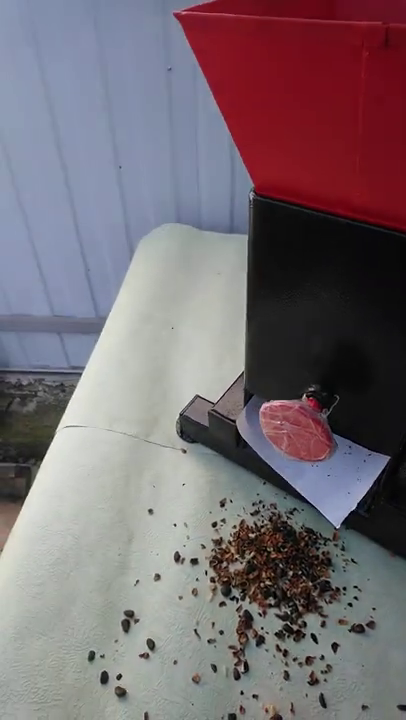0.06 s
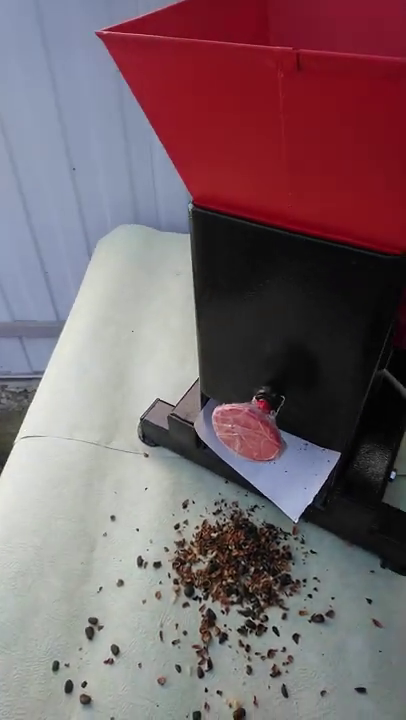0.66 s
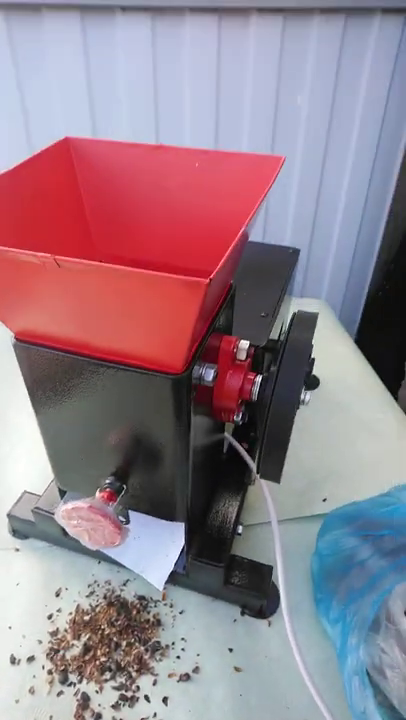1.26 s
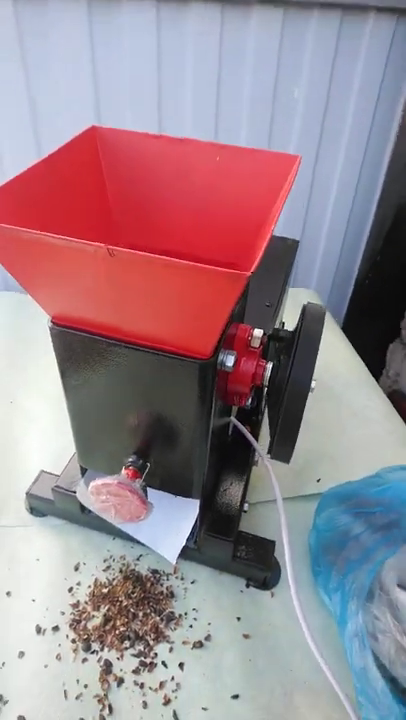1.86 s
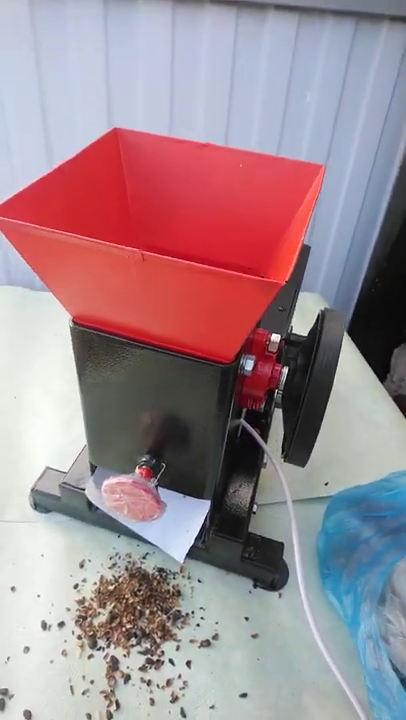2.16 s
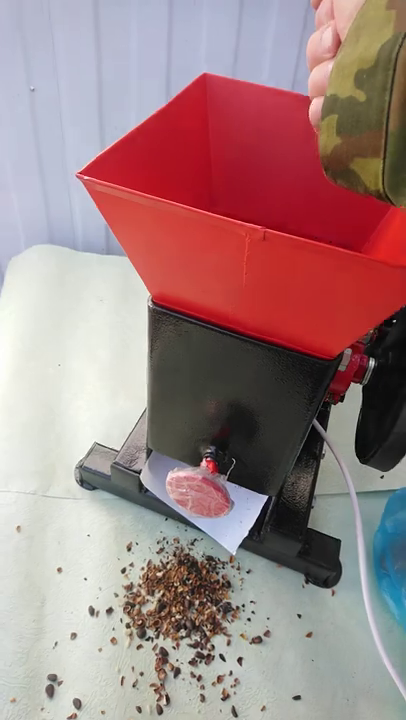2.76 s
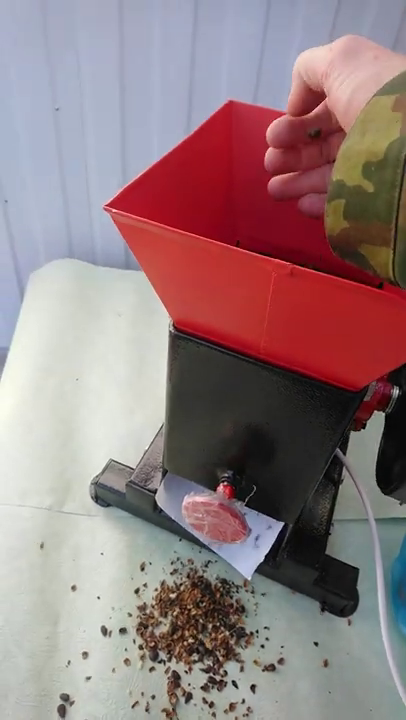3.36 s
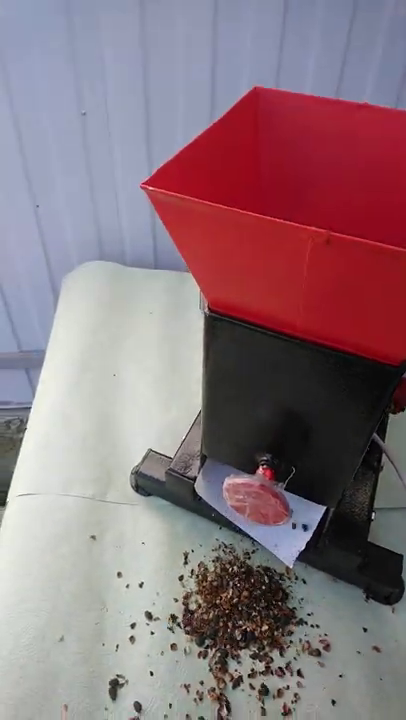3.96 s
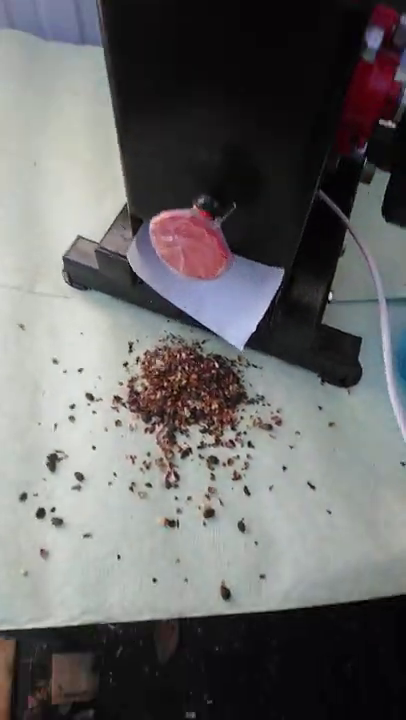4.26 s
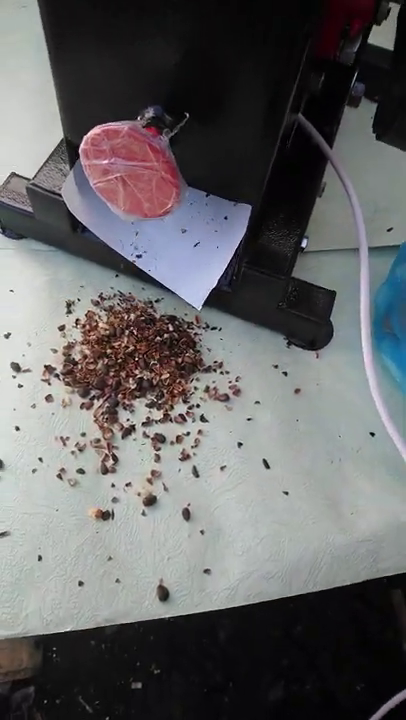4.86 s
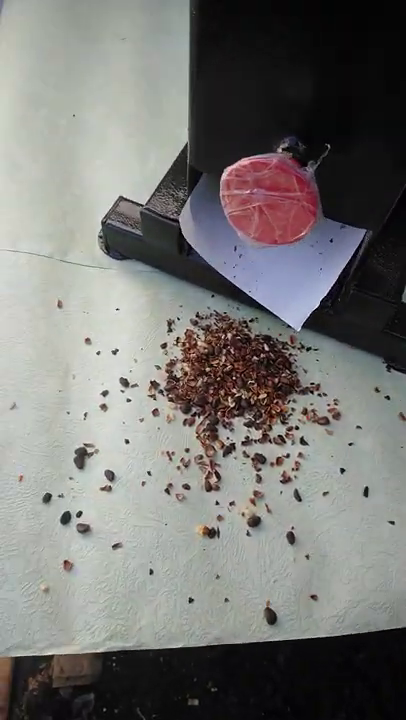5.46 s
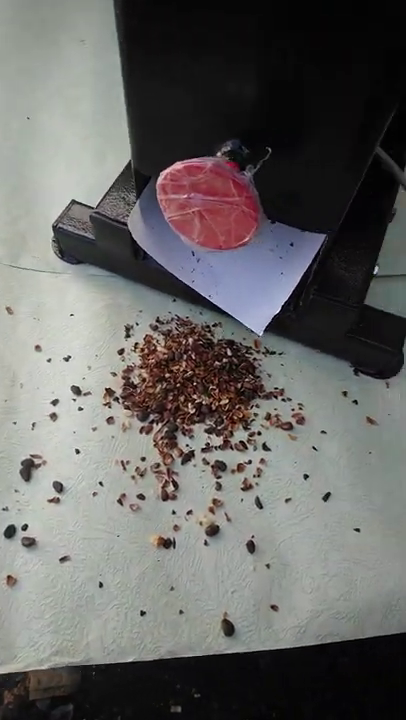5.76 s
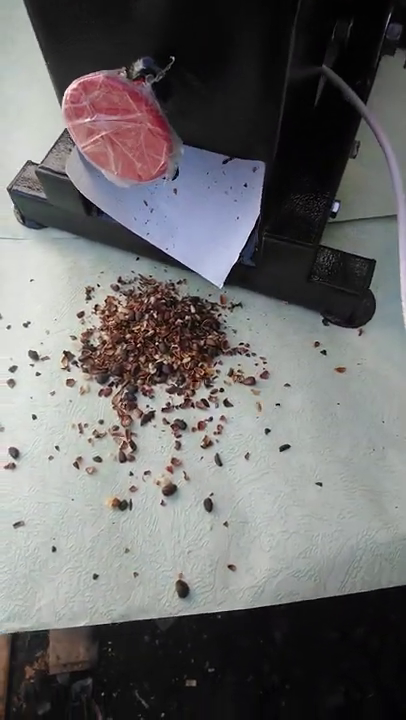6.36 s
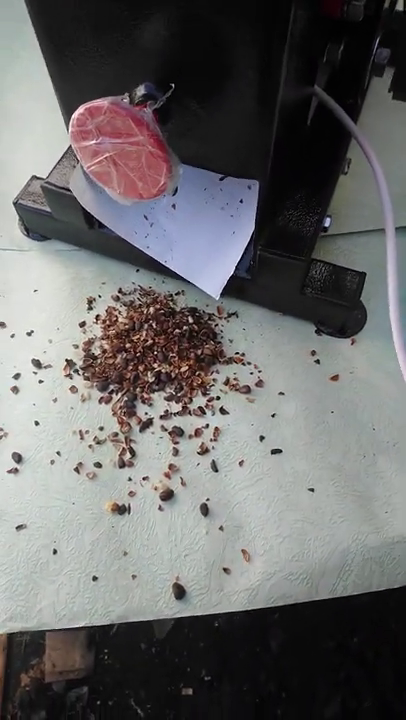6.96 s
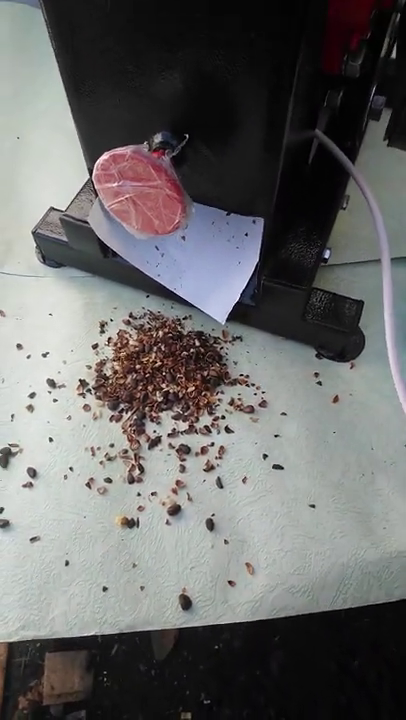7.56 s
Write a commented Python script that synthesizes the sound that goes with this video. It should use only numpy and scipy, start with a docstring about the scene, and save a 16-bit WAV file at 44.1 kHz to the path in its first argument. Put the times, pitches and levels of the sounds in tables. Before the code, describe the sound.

A belt-driven nut splitter hums and hisses outdoors near a hand-held microphone, with light taps of shell and intermittent high whistles. Midway, nuts crunch in a quick, loud cluster of cracks that rings the metal hopper and slows the rotor a little. A few separate cracks follow. The drone dips under the cracks, swells back and continues with its thin squealing.

```python
"""A steady drone with a hiss and thin squeals: a belt-driven electric nut splitter runs outdoors, close to
a hand-held camera. Its unbalanced rotor hums and rubs once a turn; bits of shell tick in the housing.
A handful of nuts rattles through the sheet-metal hopper as the rotor slows; three last shells crack.
Each fracture is a burst of noise that rings the shell and the hopper. The camera's gain control ducks
under the cracks and creeps back while the camera moves down to the spout."""
import sys
import numpy as np
from scipy import signal
from scipy.fft import rfft, irfft, next_fast_len
from scipy.io import wavfile
from scipy.ndimage import uniform_filter1d, minimum_filter1d, map_coordinates

SR = 44100
rng = np.random.default_rng(int(sys.argv[2]) if len(sys.argv) > 2 else 0)


def file_out(sig):
    """Save sig as 16-bit WAV at sys.argv[1]."""
    # one column per channel
    cols = np.atleast_2d(sig).T
    # limit, then scale
    lim = np.clip(cols, -1, 1)
    pcm = np.round(lim * 32767).astype(np.int16)
    wavfile.write(sys.argv[1], SR, pcm)


N = 339570
TIME = np.arange(N) / SR


def amp(db):
    """Decibels as an amplitude ratio."""
    return 10 ** (np.asarray(db) / 20)


def unit(x):
    """Normalisation to rms 1."""
    return x / np.sqrt(np.mean(x ** 2) + 1e-20)


def along(points, hz):
    """Interpolation of (Hz, value) points on a logarithmic frequency axis."""
    knots_hz, values = np.transpose(points)
    return np.interp(np.log(hz + 1), np.log(knots_hz + 1), values)


def curves(rows):
    """Linear interpolation: one value per sample for each column after the time."""
    times, *columns = np.transpose(rows)
    return [np.interp(TIME, times, column) for column in columns]


def wobble(rate):
    """Random modulation: a smooth curve through rate knots a second."""
    return map_coordinates(rng.standard_normal(int(N * rate / SR) + 4), [TIME * rate])


def spell(start, end, fade):
    """A trapezoidal envelope: rises at start, holds at 1 and falls at end."""
    return np.clip(np.minimum(TIME - start, end - TIME) / fade + .5, 0, 1)


def filtered(x, response):
    """Linear filtering: the spectrum of x times a complex response of frequency."""
    n = x.shape[-1]
    padded = next_fast_len(n + n // 10, True)
    return irfft(rfft(x, padded) * response(np.fft.rfftfreq(padded, 1 / SR)), padded)[..., :n]


def coloured(x, spectrum):
    """Spectral shaping of x by (Hz, dB) points, at rms 1."""
    return unit(filtered(x, lambda hz: amp(along(spectrum, hz))))


def ringing(x, modes):
    """Modal superposition: x drives (Hz, bandwidth, dB) resonators of alternating sign, at rms 1."""
    def response(hz):
        return sum((-1) ** k * amp(db) * 1j * hz * width / (centre ** 2 - hz ** 2 + 1j * hz * width)
                   for k, (centre, width, db) in enumerate(modes))
    return unit(filtered(x, response))


def running_rms(x, seconds):
    """The root of the power averaged over both channels and a sliding window."""
    power = uniform_filter1d(np.mean(x ** 2, axis=0), max(2, int(seconds * SR)))
    return np.sqrt(np.abs(power) + 1e-12)


def add(track, start, sound):
    """Superposition of a sound on the track, from start in seconds."""
    part = track[:, round(start * SR):][:, :sound.shape[1]]
    part += sound[:, :part.shape[1]]


def standing_waves(x, depth_db, spacing_hz, change_rate):
    """Interference: wall and panel echoes lift and sink narrow bands, which shift as the camera sways."""
    hz, t, spectra = signal.stft(x, SR, nperseg=1024)
    grid = np.meshgrid(hz / spacing_hz, t * change_rate, indexing="ij")
    knots = rng.standard_normal((2, 400, 32))
    field = np.array([map_coordinates(channel, grid, mode="grid-wrap") for channel in knots])
    depth = depth_db * hz / (hz + 1200)  # short waves interfere most
    _, rippled = signal.istft(spectra * amp(depth[:, None] * field), SR, nperseg=1024)
    return unit(rippled[:, :N])


# The casing's noise at the hopper and at the spout. Each row: frequency in Hz, relative density in dB.
CASING_AT_HOPPER = [(25, -25), (55, -5), (110, 10.5), (140, -2), (230, -6), (360, 4), (500, -6.5), (600, 5),
                    (830, -1.5), (1100, 2.5), (1500, -7.5), (2100, -5.5), (2900, -15), (5000, -29)]
CASING_AT_SPOUT = [(25, -30), (55, -2), (110, 3.5), (230, -2), (350, 9), (510, -1), (600, 2), (750, 1.5),
                   (1000, 3.5), (1170, -8.5), (1400, -3.5), (1850, -6), (2900, -10.5), (5000, -23)]
# The casing panels' modes. Each row: frequency in Hz, bandwidth in Hz, relative gain in dB.
PANEL_MODES = [(583, 47, -1), (794, 24, -5), (1000, 46, -3.5), (1124, 66, -2), (1367, 63, -2),
               (1813, 76, -7)]

def casing_rumble(turns, near, rattle_db=1.5, throb_db=0.2, panel_db=-7, knock_db=4):
    """Forced vibration: the casing rattles unevenly, throbs once a turn and knocks its hollow panels."""
    shake = rng.standard_normal((2, N))
    shake *= amp(rattle_db * wobble(220) + throb_db * np.cos(2 * np.pi * turns))
    body = (1 - near) * coloured(shake, CASING_AT_HOPPER) + near * coloured(shake, CASING_AT_SPOUT)
    knocks = rng.standard_normal((2, N)) * amp(knock_db * wobble(150))
    casing = body + amp(panel_db) * ringing(knocks, PANEL_MODES)
    return standing_waves(casing, depth_db=5.5, spacing_hz=79.14, change_rate=1.142)


# The hum's tones. Each entry: a multiple of the rotor speed; pulley and belt give the fractional ones.
HUM_ORDERS = [.837, 1, 1.05, 1.163, 1.28, 1.35, 1.84, 1.93, 2, 2.05, 2.163, 4, 7, 8, 11]
# The hum at the hopper and at the spout. Each entry: relative level of the matching tone in dB.
HUM_AT_HOPPER = [-73, -24, -47, -34, -45, -42.5, -41.5, -39.5, -23.5, -34.5, -40.5, -28.5, -34.5, -41.5,
                 -38]
HUM_AT_SPOUT = [-59, -26, -53.5, -35.5, -39, -36.5, -44, -43, -19.5, -35.5, -29.5, -30, -37.5, -44, -42]

def rotor_hum(turns, near, waver_db=0.7, drift_rad=0.12, rough_db=0.42):
    """Rotating unbalance: rotor, pulley and belt shake the frame; higher orders rattle more."""
    out = np.zeros(N)
    for order, hopper_db, spout_db in zip(HUM_ORDERS, HUM_AT_HOPPER, HUM_AT_SPOUT):
        level_db = hopper_db + near ** 2 * (spout_db - hopper_db) + waver_db * wobble(6.9)
        rattle = unit(amp(rough_db * order * wobble(60)))
        phase = 2 * np.pi * order * turns + drift_rad * wobble(11)
        out -= np.sqrt(2) * amp(level_db) * rattle * np.cos(phase)
    return out


# Friction noise at the hopper and at the spout. Each row: frequency in Hz, relative density in dB.
RUB_AT_HOPPER = [(1500, -17.5), (3000, -5), (4000, -1.5), (5200, -0.5), (6000, -4.5), (6900, -7.5),
                 (7900, -21.5), (8800, -13.5), (10500, -17), (12500, -20.5), (15500, -17)]
RUB_AT_SPOUT = [(1500, -31), (3000, -5), (4000, -3.5), (5000, 0), (6000, -3.5), (6800, -7), (7900, -29.5),
                (8800, -14), (10500, -16.5), (12500, -24.5), (15500, -17.5)]

def rotor_rub(turns, near, change_rate=1.106, bumps_db=1.0, hiss_db=-2.5, grains=512, spots=16):
    """Periodic friction: the same rough track, rubbed each turn, gives a slowly changing line spectrum."""
    age, position = TIME * change_rate, turns % 1
    tracks = rng.standard_normal((2, int(age[-1]) + 3, grains))
    scrape = np.array([map_coordinates(track, [age, position * grains], mode="grid-wrap")
                       for track in tracks])
    high_spots = map_coordinates(unit(rng.standard_normal(spots)), [position * spots], mode="grid-wrap")
    hiss = amp(hiss_db) * rng.standard_normal((2, N))
    friction = (unit(scrape) + hiss) * amp(bumps_db * high_spots)
    rub = (1 - near) * coloured(friction, RUB_AT_HOPPER) + near * coloured(friction, RUB_AT_SPOUT)
    return standing_waves(rub, depth_db=4.5, spacing_hz=149.2, change_rate=2.19)


def whistle(turns, order, slip_rad=0.26, throb=0.18, flutter_db=1.9):
    """Friction-excited tone: a high spot of the rotor sings, flutters and swells once a turn, at rms 1."""
    tone = np.sin(2 * np.pi * order * turns + slip_rad * wobble(160))
    flutter = amp(flutter_db * wobble(50))
    return unit(tone * flutter * (1 + throb * np.cos(2 * np.pi * turns)))


# The main whistle's squeals. Each row: start in seconds, end in seconds, level in dB.
SQUEAL_SPELLS = [(0, .65, -33.5), (0.947, 1.33, -33.5), (2.398, 2.663, -29.5), (2.75, 3.28, -35),
                 (4.72, 5.83, -31), (5.91, 6.06, -31.5), (6.33, 6.7, -33.5), (6.97, 7.8, -33)]
# The weaker whistles. Each entry: cycles per turn of the rotor.
WEAK_ORDERS = [36, 40, 51, 54, 63, 70]
# The camera's pass through each one's beam. Each row: time in seconds, half width in seconds, level in dB.
BEAM_PASSES = [(0.38, 0.3, -37.5), (4.83, 1, -38), (5.9, 0.31, -33.5), (.25, 0.76, -34.5), (7.7, .6, -35),
               (6.9, 0.86, -36)]

def rotor_squeals(turns, main_order=59, fade_s=0.11, rest_db=-38, off_beam_db=-46):
    """Directivity: weak whistles swell as the camera crosses their beams; the main one comes in spells."""
    squeals = sum(amp(db) * spell(start, end, fade_s) for start, end, db in SQUEAL_SPELLS)
    out = np.maximum(squeals, amp(rest_db)) * whistle(turns, main_order)
    for order, (centre, width, db) in zip(WEAK_ORDERS, BEAM_PASSES):
        beam = amp(db) * np.exp(-((TIME - centre) / width) ** 2)
        out += np.maximum(beam, amp(off_beam_db)) * whistle(turns, order)
    return out


# The loose housing's modes. Each row: frequency in Hz, bandwidth in Hz, relative gain in dB.
HOUSING_MODES = [(1990, 80, -3.5), (2540, 93, 1.5), (2710, 64, 2), (3700, 200, -6.5)]
# The dry click of any impact. Each row: frequency in Hz, relative density in dB.
IMPACT_SPECTRUM = [(120, -24), (200, -4.5), (400, -5), (650, -8), (1000, 0.5), (1450, -10), (2000, -3),
                   (2650, 1), (3200, -9.5), (4000, -1.5), (5900, -3.5), (7200, -13.5), (8200, -27.5),
                   (15500, -29)]
# Spells of harder pattering. Each row: start in seconds, end in seconds, level in dB.
PATTER_SPELLS = [(0, .6, -36), (0.804, 1.15, -35.5), (1.978, 2.42, -31), (2.756, 3.3, -30.5)]

def shell_patter(rate_hz=60, scatter=.3, spread_db=4.5, t60=0.013, click_db=-2, fade_s=0.02, rest_db=-39):
    """Impulse excitation: bits of shell bounce off the rotor unevenly and tick against the housing."""
    jitter, strength = rng.standard_normal((800, 2)).T
    onsets = np.round((np.arange(len(jitter)) + scatter * jitter) / rate_hz * SR).astype(int)
    impulses = np.bincount(np.abs(onsets), amp(spread_db * np.clip(strength, -2, 2)), N)[:N]
    decay = amp(-60 * np.arange(SR // 20) / SR / t60)
    ticks = signal.fftconvolve(impulses, decay)[:N] * rng.standard_normal((2, N))
    patter = unit(ringing(ticks, HOUSING_MODES) + amp(click_db) * coloured(ticks, IMPACT_SPECTRUM))
    spells = sum(amp(db) * spell(start, end, fade_s) for start, end, db in PATTER_SPELLS)
    return np.maximum(spells, amp(rest_db)) * patter


# The housing's loudest taps. Each row: start in seconds, relative peak level in dB.
HOUSING_TAPS = [(0.0942, -10), (0.5314, -14.5), (0.815, -18), (0.885, -15), (1.0136, -13.5), (2.0384, -22),
                (2.2059, -16), (2.2757, -10.5), (2.3447, -22), (2.8499, -19), (3.0884, -17), (3.1118, -14),
                (3.215, -16)]

def housing_chatter(drive_t60=0.026, level_db=-3.5, click_db=2, click_t60=0.015):
    """Damped vibration: each tap of the loose housing gives a dry click and a short ring."""
    out, t = np.zeros((2, N)), np.arange(SR // 10) / SR
    for start, db in HOUSING_TAPS:
        ring = ringing(rng.standard_normal((2, len(t))) * amp(-60 * t / drive_t60), HOUSING_MODES)
        click = coloured(rng.standard_normal((2, len(t))) * amp(-60 * t / click_t60), IMPACT_SPECTRUM)
        tap = ring + amp(click_db) * click
        add(out, start, tap * amp(db + level_db) / running_rms(tap, 0.006).max())
    return out


# The sheet-metal hopper's modes. Each row: frequency in Hz, bandwidth in Hz, relative gain in dB.
HOPPER_MODES = [(619, 20, -2.5), (954, 46, -4.5), (1324, 30, -8), (1680, 40, -4.5), (1880, 30, -11),
                (2660, 31.4, 5.5), (3780, 46, -21), (4200, 29, -10), (4470, 39, -10), (5400, 65, -15),
                (5960, 59, -16), (7800, 43, -19.5)]
# The fine spray of splinters. Each row: frequency in Hz, relative density in dB.
SPLINTER_SPECTRUM = [(3000, -25), (6000, 7), (8200, -15), (11000, -11), (15500, 4)]
# Nuts struck by the rotor. Each row: start in seconds, peak level in dB, the crunch's 60 dB decay time
# in seconds, balance in dB (added to the shell's snap and taken from the hopper's ring).
NUT_STRIKES = [ (3.257, -8, 0.091, -3), (3.272, 1.5, 0.064, 3.5), (3.31, 1, 0.064, 4), (3.329, 1, 0.12, 7),
               (3.346, -0.5, 0.11, -1), (3.365, 0.5, 0.15, -1), (3.383, 0, 0.097, 3), (3.4, 9, 0.17, -5),
               (3.423, 9.5, 0.073, -5), (3.457, 10, 0.1, -5), (3.486, 12, 0.057, -5), (3.518, 7, .07, -7),
               (3.53, 6.5, 0.17, -3.5), (3.573, 5.5, 0.16, -7), (3.625, -1, .07, -12),
               (3.684, 7, 0.19, -8.5), (3.761, -3.5, 0.16, -1), (3.791, -2.5, .12, -7),
               (3.814, 9, 0.14, -1), (3.843, 8.5, 0.069, -2.5), (3.866, 6.5, 0.073, -5),
               (3.96, -13, 0.031, -8), (4.13, -12, .12, -2), (4.15, 2, 0.087, 8), (4.216, -12, 0.033, -11),
               (4.294, -12, .15, 4), (4.315, 1.5, 0.056, 9), (4.575, 2, 0.1, 9.5)]
SNAP_HZ, SNAP_WIDTH_HZ, SNAP_SCATTER = 3934, 210, 0.015  # a shell's mode; its relative spread in pitch
CREAK_LEAD_S, CREAK_WIDTH_S, CREAK_DB = 0.0066, 0.005, -18.5

def nut_cracks(grit_db=3, attack_s=0.0009, snap_db=-6, ring_db=-2.5, split_db=3, split_t60=0.0034,
               splinter_db=-14):
    """Brittle fracture: each nut creaks, splits and crunches, exciting the modes of shell and hopper."""
    out, lead = np.zeros((2, N)), SR // 25
    t = np.arange(-lead, SR // 4) / SR
    age = np.maximum(t, 0)
    for start, db, t60, balance_db in NUT_STRIKES:
        grit = unit(uniform_filter1d(rng.standard_normal(len(t)), size=40))
        crunch = amp(grit_db * grit - 60 * age / t60)
        split = amp(split_db - 60 * age / split_t60)
        force = (crunch + split) * (1 - np.exp(-age / attack_s))
        creak = amp(CREAK_DB + grit_db * grit) * np.exp(-((t + CREAK_LEAD_S) / CREAK_WIDTH_S) ** 2)
        burst = rng.standard_normal((2, len(t))) * (force + creak)
        blow = burst * amp(-60 * age / t60)  # the first fracture does most of the striking
        shell_hz = SNAP_HZ * (1 + SNAP_SCATTER * rng.standard_normal())
        snap = amp(snap_db + balance_db) * ringing(blow, [(shell_hz, SNAP_WIDTH_HZ, 0)])
        ring = amp(ring_db - balance_db) * ringing(blow, HOPPER_MODES)
        splinters = amp(splinter_db) * coloured(blow, SPLINTER_SPECTRUM)
        crack = coloured(burst, IMPACT_SPECTRUM) + splinters + snap + ring
        add(out, start - lead / SR, crack * amp(db) / running_rms(crack, 0.0018).max())
    return out


# The likeness of the two microphone ports. Each row: frequency in Hz, left-right correlation.
PORT_COHERENCE = [(100, 0.81), (300, 0.92), (1000, 0.53), (3000, 0.083), (12000, 0.053)]

def stereo_ports(pair, lead_ms):
    """Partial coherence: two unrelated signals become partly alike channels; the left one leads."""
    def mid_side_gains(hz):
        angle = np.arccos(np.clip(along(PORT_COHERENCE, hz), -1, 1)) / 2
        return np.array([np.cos(angle), np.sin(angle)])
    mid, side = filtered(pair, mid_side_gains)
    half_lead = lead_ms * SR / 2000  # in samples
    left = map_coordinates(mid + side, [np.arange(N) + half_lead])
    right = map_coordinates(mid - side, [np.arange(N) - half_lead])
    return np.array([left, right])


# The rotor's speed, which sags under the nuts. Each row: time in seconds, turns per second.
ROTOR_SPEED = [(0, 87.87), (.5, 87.93), (1, 88.2), (1.7, 88.27), (2.3, 87.83), (3.3, 87.8), (3.6, 82),
               (4.1, 82.8), (5, 83.9), (6.2, 84.88), (6.9, 84.22), (7.7, 83.82)]
# The camera's path. Each row: time in seconds, nearness to the spout from 0 to 1, left port's lead in ms.
CAMERA_PATH = [(0, 0, 0.3), (.75, 0.1, 0.32), (1.2, 0.13, 0.43), (2, 0.02, 0.37), (3.3, 0.15, 0.36),
               (4, 0, 0.377), (4.5, 0.7, 0.536), (5.7, 0.96, 0.5), (7.7, 0.86, 0.47)]
# The machine's balance along that path. Each row: time in seconds, gains of rumble, rub and hum in dB.
RUNNING_GAINS = [(0, -22.5, -23.5, -0.5), (1.5, -24, -25.5, -2.5), (3.2, -23.5, -26, -1.5),
                 (4.2, -20, -20, -3), (5.2, -22, -22.5, -4.5), (6.2, -23.5, -24.5, -2), (7.7, -22, -22, -3)]
CHEW_RUMBLE_DB, CHEW_RUB_DB = 4, 1.5  # the rise under load

def scene():
    """Superposition: the running machine and the nuts add up at the moving camera."""
    turns = np.cumsum(curves(ROTOR_SPEED)[0]) / SR
    near, lead_ms = curves(CAMERA_PATH)
    rumble_db, rub_db, hum_db = curves(RUNNING_GAINS)
    load = spell(start=3.38, end=4.01, fade=0.19)  # the rotor chews the handful
    rub = amp(rub_db + CHEW_RUB_DB * load) * rotor_rub(turns, near)
    rumble = amp(rumble_db + CHEW_RUMBLE_DB * load) * casing_rumble(turns, near)
    noises = stereo_ports(rumble + rub + shell_patter() + housing_chatter() + nut_cracks(), lead_ms)
    tones = amp(hum_db) * rotor_hum(turns, near) + rotor_squeals(turns)
    lean_db = -.6 + 1.6 * near  # at the spout the machine lies to the left
    return (noises + tones) * amp([lean_db, -lean_db])


def gain_control(x, ceiling_db=-14, hold_s=0.079, recovery_per_s=0.87):
    """Limiting: the gain falls at once under loud treble, holds briefly, then climbs back linearly."""
    treble = filtered(x, lambda hz: hz ** 2 / (hz ** 2 + 600 ** 2))
    needed = np.minimum(1, amp(ceiling_db) / running_rms(treble, 0.0057))
    half_hold = max(1, int(hold_s * SR / 2))
    held = minimum_filter1d(needed, 2 * half_hold + 1, origin=half_hold)
    climb = recovery_per_s * TIME
    gain = np.minimum.accumulate(held - climb) + climb
    return x * uniform_filter1d(gain, size=64)


# The two ports' unequal responses. Each row: frequency in Hz, level of left over right in dB.
PORT_IMBALANCE = [(60, 3), (200, -1.2), (380, -3.5), (700, 2), (1300, 0.5), (4400, -1.5), (6500, 11),
                  (8200, 12), (10500, 8), (13000, -1), (15500, -3.5)]
CLIP_LEVEL, TOP_HZ = .62, 16000

def record(dry):
    """Transduction in the camera: port colouration, gain control, soft clipping and a band limit."""
    at_ports = filtered(dry, lambda hz: amp(np.outer([.5, -.5], along(PORT_IMBALANCE, hz))))
    limited = gain_control(at_ports)
    rounded = limited / (1 + np.abs(limited / CLIP_LEVEL) ** 6) ** (1 / 6)
    return filtered(rounded, lambda hz: hz < TOP_HZ)


dry = scene()
out = record(dry)
file_out(out)
```